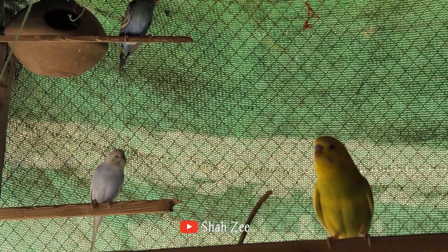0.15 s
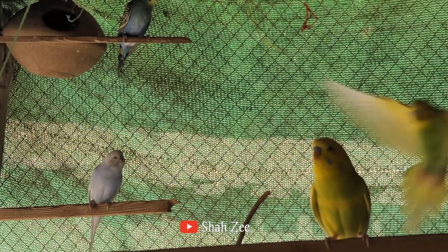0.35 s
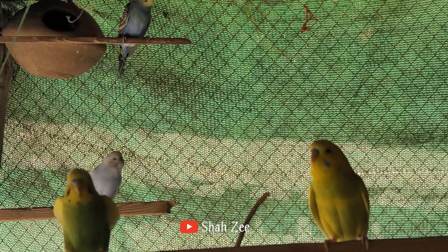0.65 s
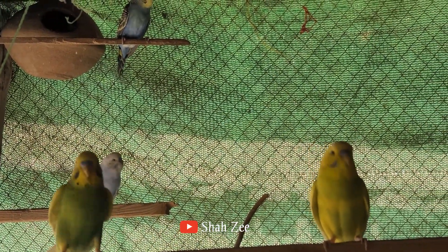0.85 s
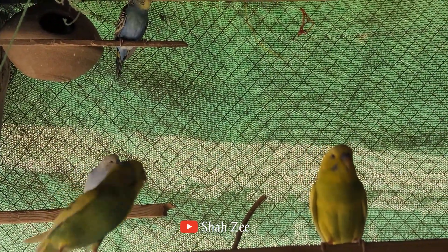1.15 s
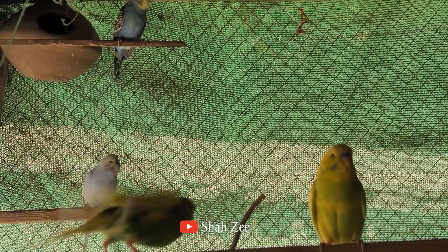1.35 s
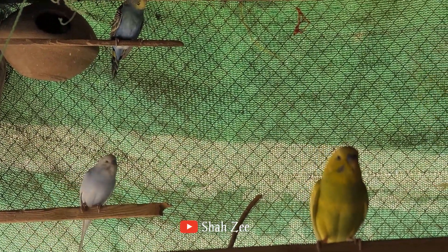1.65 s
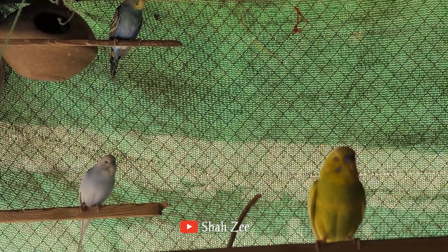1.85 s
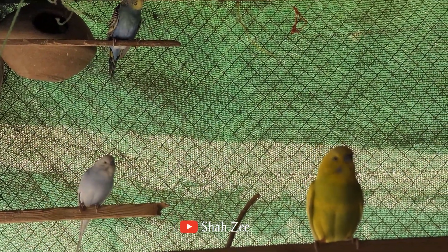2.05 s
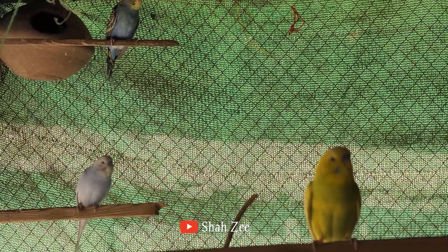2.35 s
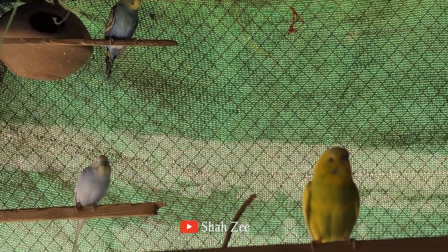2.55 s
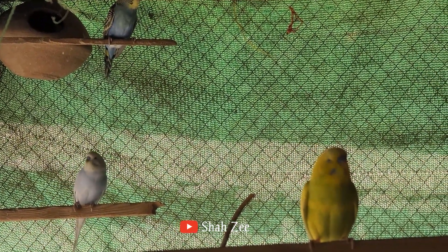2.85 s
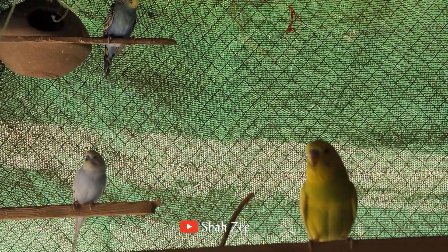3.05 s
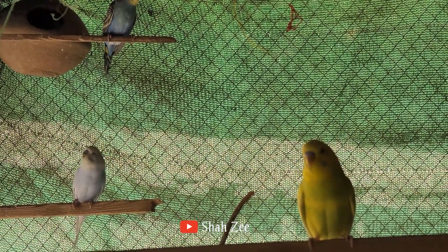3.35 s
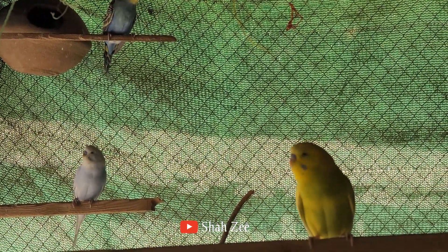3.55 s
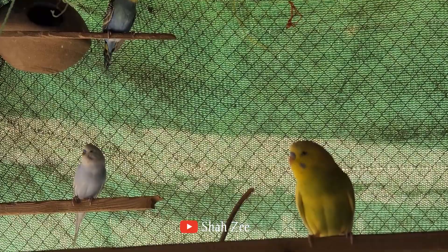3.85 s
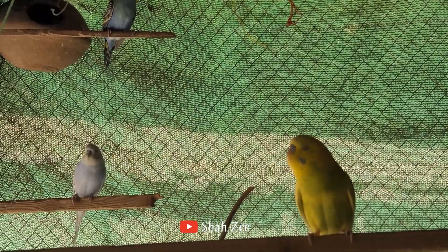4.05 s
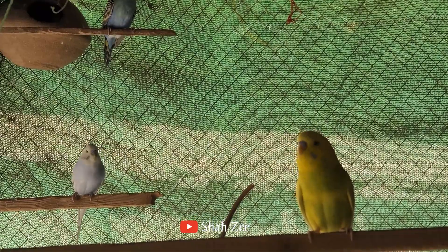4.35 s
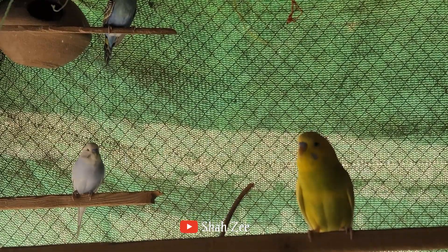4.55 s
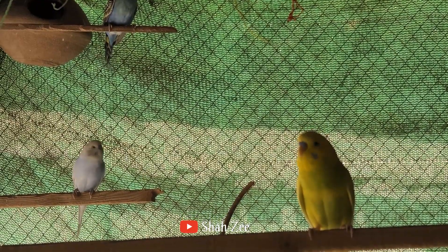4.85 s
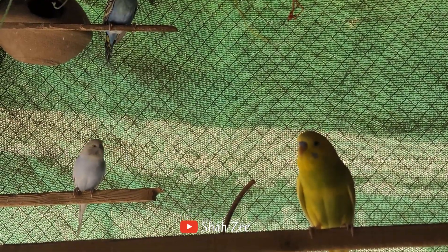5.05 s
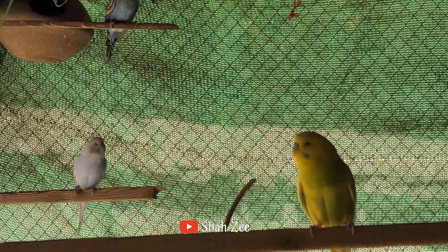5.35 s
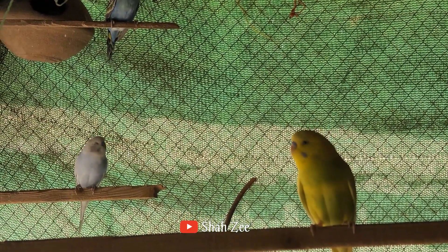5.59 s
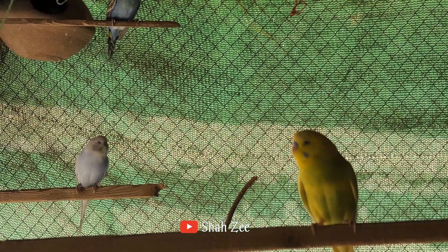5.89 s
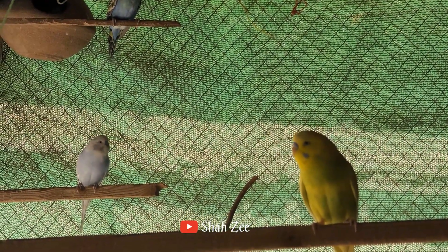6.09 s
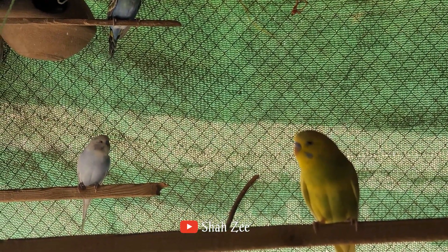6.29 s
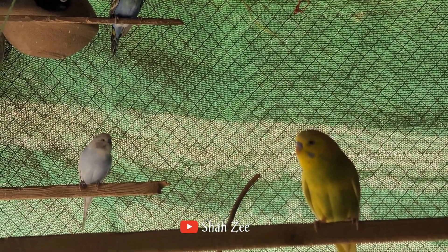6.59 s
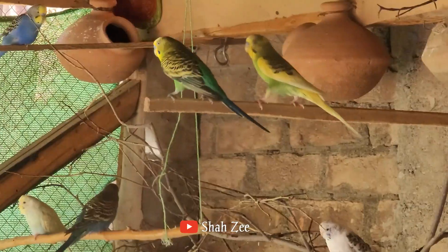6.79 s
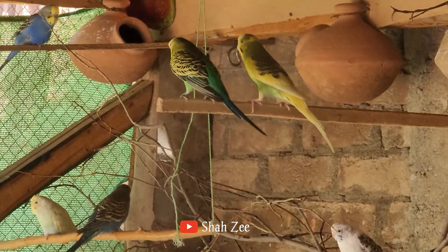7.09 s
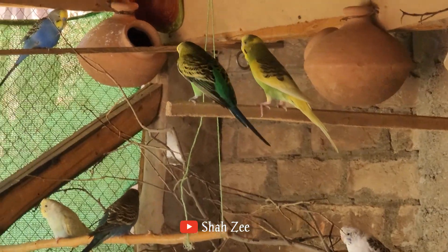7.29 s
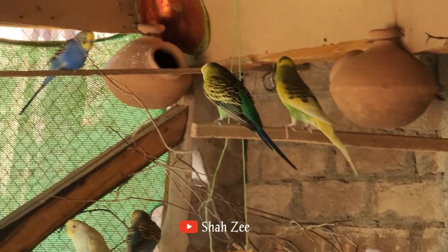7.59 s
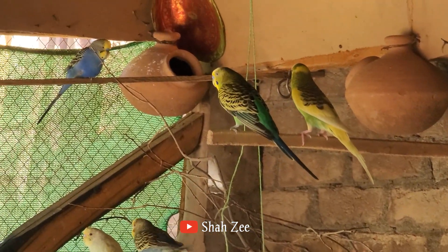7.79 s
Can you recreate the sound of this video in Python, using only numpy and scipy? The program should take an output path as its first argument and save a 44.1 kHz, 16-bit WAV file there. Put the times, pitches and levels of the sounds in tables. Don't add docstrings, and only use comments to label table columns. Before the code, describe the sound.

Close small parrots give short bursts of whistled, buzz-edged syllables, loudest around the middle, with short tight echoes off walls. Between bursts come airy wing flaps, low dry rasps and weak, high, regular chick peeps. Later, far birds whistle and chatter softly, and one more near chirp sounds with a swish. A handheld-style stereo pickup holds constant street rumble, faint hum and hiss, its automatic level easing back after loud calls.

```python
import sys
import numpy as np
from scipy import signal
from scipy.fft import rfft, irfft, next_fast_len
from scipy.io import wavfile
from scipy.ndimage import uniform_filter1d, map_coordinates

SR = 44100
rng = np.random.default_rng(int(sys.argv[2]) if len(sys.argv) > 2 else 0)


def master_out(mix):
    frames = np.transpose(np.atleast_2d(mix))
    ceiling = np.clip(frames, -1, 1)
    pcm = np.round(ceiling * 32767).astype(np.int16)
    wavfile.write(sys.argv[1], SR, pcm)


def how_loud(loudness_db):
    steps = np.asarray(loudness_db, float) / 20
    return 10 ** steps


N = 349713

# [t/s from just past its first crest, share of top pitch, level/dB]
PEEP_SHAPE = [
    (-.065, 0.59, -7.5),
    (-.02, 0.994, 3),
    (0, 0.93, 0.5),
    (0.043, .75, -1),
    (0.058, .82, -7),
    (.075, .9, 1.5),
    (0.11, 0.8, -19),
]


def evened(x):
    return x / np.sqrt(np.mean(x ** 2) + 1e-20)


def read(points, hz):
    f, value = np.transpose(points)
    return np.interp(np.log(hz + 1), np.log(f + 1), value)


def add(mix, s, sound):
    part = mix[max(round(s * SR), 0):][:len(sound)]
    part += sound[:len(part)]


def coloured(x, gain):
    size = next_fast_len(len(x))
    return irfft(rfft(x, size) * gain(np.fft.rfftfreq(size, 1 / SR)), size)[:len(x)]


def wobble(size, rate_hz):
    noise = rng.standard_normal(size + 2000)
    return evened(coloured(noise, lambda f: np.exp(-(f / rate_hz) ** 2)))[:size]


def beak_air(size):
    # [f/Hz, level/dB per Hz]
    air_spectrum = [(2650, -49), (4500, -13), (4770, 6.5), (5990, 3.5), (7450, -6.5), (10800, -18),
                    (13000, -6.5), (16000, -10.5)]
    lump_hz, lumps_db = np.linspace(0, SR / 2.6, 14), 7 * rng.standard_normal(14)
    noise = rng.standard_normal(size)
    return evened(coloured(noise, lambda f: how_loud(read(air_spectrum, f) + np.interp(f, lump_hz, lumps_db))))


def glide(length, start_hz, end_hz, db, buzz, breath_db=0):
    overtones_db = [-23, -38, -43, -39.5]
    low_voice_hz, throb_hz, throb_depth = 2050, 215.96, 0.6
    windpipe_hz, beak_top_hz = 1660, 4513
    size, buzz = round(max(length, .004) * SR), np.clip(buzz, 0, 1)

    shake = (.003 + .055 * buzz ** 1.7) * wobble(size, 300)
    hz = np.linspace(start_hz, end_hz, size) * (1 + shake)
    turns = 2 * np.pi * (np.cumsum(hz) / SR + rng.random())
    sag = np.linspace(1.12, .95, size)
    low_hz = low_voice_hz * (sag + 0.0547 * wobble(size, 79))

    beats = 2 * np.pi * np.cumsum(hz - low_hz) / SR
    flutter = (.1 + .7 * buzz ** 1.7) * wobble(size, 700)
    chop = 1 + buzz ** 1.4 * (0.5 * np.cos(beats) + 0.85 * np.cos(beats / 2)) + flutter

    throb_turns = np.cumsum(throb_hz * (1 + 0.296 * wobble(size, 59.1))) / SR + rng.random()
    pulse = 1 + throb_depth * min(buzz / .06, 1) * np.cos(2 * np.pi * throb_turns)

    overtones = sum(how_loud(d + breath_db) * np.cos(k * turns) for k, d in enumerate(overtones_db, 2))
    air = beak_air(size) * how_loud(-26 + breath_db + 10.23 * buzz)

    t = np.arange(size) / SR
    ramp = np.clip(np.minimum(t / 0.00469, (t[-1] - t) / 0.00446), 0, 1)
    swell = np.sin(np.pi / 2 * ramp) ** 2
    low_edge_hz = min(windpipe_hz, 0.906 * min(start_hz, end_hz))
    top_hz = max(beak_top_hz, 1.1 * max(start_hz, end_hz))
    voice = coloured(np.cos(turns) * chop * pulse,
                     lambda f: 1 / (1 + (low_edge_hz / (f + 1)) ** 14) / (1 + (f / top_hz) ** 16))
    return how_loud(db) * (evened(voice) + (overtones + air) * pulse) * swell


def syllable(shape, s, length, hz, db, buzz):
    overlap_s = .002
    starts = s + length * np.cumsum([0] + [row[0] for row in shape])
    return [(at, share * length + overlap_s, a * hz, b * hz, db + d, buzz * z)
            for at, (share, a, b, d, z) in zip(starts, shape)]


def chirps():
    # [share of length, start share of pitch, end share of pitch, level/dB, buzz 0-1]
    fall = [
        (.24, 1.06, 0.9105, -6.5, .03),
        (0.52, .96, .89, 1.5, 0.12),
        (.3, .89, .8, 2.5, 0.423),
    ]
    buzz = [
        (.5, 0.95, 1.08, 0.0013, 0.897),
        (.6, 1.06, 1.16, 0, 0.873),
    ]
    arch = [
        (.28, .82, .94, 2, 0.16),
        (.36, .95, 0.974, 3.5, 0.056),
        (.36, .97, .83, -.5, 0.347),
    ]
    # [t/s, length/s, pitch/Hz, level/dB, share of the buzz]
    falls = [
        (0.545, 0.0573, 3482, -26, 1),
        (0.969, 0.0369, 3960, -32, 1.4),
        (2.945, 0.053, 3504, -23, 0.6),
        (2.983, 0.0616, 3571, -16, 1.37),
        (3.278, 0.0629, 3451, -26, 1.02),
        (3.794, .06, 3450, -20.5, 0.61),
        (7.087, 0.0555, 3453, -29, 0.52),
        (7.872, 0.068, 3494, -37, .8),
    ]
    buzzes = [
        (.004, 0.0287, 3289, -25, 1.007),
        (.1, 0.0224, 3442, -27, 0.99),
        (.604, 0.0282, 3319, -26.5, 0.96),
        (3.04, 0.02745, 3004, -17.5, 0.862),
        (3.346, 0.028, 3352, -26.5, 1.106),
        (3.856, 0.0284, 3396, -22, 0.86),
        (7.155, 0.0225, 3318, -32.5, 1.05),
    ]
    arches = [
        (.04, 0.049, 3261, -22, 2),
        (.636, 0.0507, 3341, -22, 0.98),
        (1.07, 0.043, 3245, -24, 1.03),
        (1.326, 0.0472, 3109, -30.5, 0.39),
        (3.075, 0.0455, 3389, -19.5, 0.72),
        (3.381, 0.048, 3219, -22, 0.55),
        (3.89, 0.0488, 3261, -18, 0.9),
        (7.178, 0.0536, 3404, -28.5, 1.16),
    ]
    return [note for shape, rows in ((fall, falls), (buzz, buzzes), (arch, arches))
            for row in rows for note in syllable(shape, *row)]


def loose_notes():
    # [t/s, length/s, start f/Hz, end f/Hz, level/dB]
    side_notes = [(0.0, 0.008, 3120, 3150, -19), (0.0, 0.0327, 2800, 2666, -30.5),
                  (0.098, 0.022, 2800, 2912, -30), (.12, .028, 3050, 2800, -30),
                  (.05, .014, 3200, 3200, -23), (.588, 0.0204, 3305, 2800, -23),
                  (0.609, 0.0315, 3700, 3757, -29.5), (0.966, 0.0103, 3805, 4273, -34.5),
                  (1.002, 0.0247, 4273, 3376, -32), (1.184, 0.0123, 1993, 2000, -36.5),
                  (3.786, 0.0082, 4460, 3800, -30.5), (1.029, 0.0113, 3924, 3294, -33.5),
                  (1.027, 0.0281, 2961, 2980, -30.5), (1.014, 0.0247, 2410, 1881, -37),
                  (1.053, 0.0237, 1954, 2426, -33.5), (1.276, 0.05, 2890, 2308, -38),
                  (3.025, 0.0208, 3168, 2741, -23), (3.049, 0.0243, 3220, 3329, -26.5),
                  (3.067, 0.0284, 3013, 2642, -22), (4.036, 0.0152, 2933, 2203, -41.5),
                  (4.101, 0.059, 2900, 2410, -34.5), (7.14, 0.0192, 2955, 2546, -26.5),
                  (7.141, 0.0157, 4330, 4080, -37.5), (3.41, 0.0277, 2901, 2800, -33.5)]
    # [t/s, length/s, start f/Hz, end f/Hz, level/dB]
    flourish_notes = [(1.168, 0.013, 3628, 4317, -32.5), (1.182, 0.018, 4050, 3760, -30),
                      (1.199, 0.03573, 4156, 4249, -24), (1.213, 0.0165, 2800, 4184, -25),
                      (1.222, .026, 2945, 3423, -30), (1.235, .022, 4315, 3984, -27),
                      (1.248, .03, 2982, 3531, -21.5), (1.277, 0.0217, 3483, 3496, -31.5),
                      (1.19, 0.014, 4953, 4880, -42), (4.026, 0.015, 3395, 4460, -25.5),
                      (4.04, 0.012, 4326, 3640, -21), (4.052, 0.028, 3690, 3746, -27.5),
                      (4.06, 0.02, 4176, 4230, -18.5), (4.079, 0.0258, 2670, 3265, -24.5),
                      (4.082, 0.016, 3151, 4760, -14), (4.099, 0.0093, 4332, 3590, -28.5),
                      (4.105, .018, 3970, 3810, -17.5), (4.113, 0.027, 3372, 3232, -15),
                      (4.137, .012, 3365, 4265, -34.5), (4.147, 0.018, 3413, 3360, -26.5)]
    # [t/s, length/s, start f/Hz, end f/Hz, level/dB]
    low_notes = [
        (0.597, .016, 2167, 1963, -39.5),
        (0.622, 0.024, 2050, 1850, -43),
        (3.029, 0.013, 2198, 2003, -34.5),
        (3.066, .022, 2050, 1933, -34.5),
        (3.339, 0.014, 2300, 2050, -43),
        (3.356, .02, 2002, 1933, -37.5),
        (3.856, 0.012, 2050, 2003, -31),
        (3.881, 0.0157, 2050, 1923, -35),
        (7.144, 0.0098, 2160, 2050, -33.5),
        (7.177, .022, 2110, 1960, -43),
    ]
    # [t/s, length/s, start f/Hz, end f/Hz, level/dB]
    clear_notes = [(.034, 0.0111, 2000, 2004, -32.5), (.065, .033, 2820, 2729, -24.5),
                   (.148, 0.014, 2950, 2860, -23), (.69, 0.0217, 2909, 2800, -34.5),
                   (0.989, 0.0188, 2797, 2868, -25), (1.012, 0.0116, 2790, 2800, -30.5),
                   (1.038, 0.0127, 1488, 1542, -37), (1.058, 0.0118, 4330, 4310, -40.5),
                   (1.095, .03, 2800, 2681, -36), (1.128, .035, 2703, 2697, -39),
                   (1.299, 0.0161, 1845, 1860, -33), (1.355, 0.0211, 2753, 2643, -35.5),
                   (1.385, 0.0295, 2724, 2703, -41), (3.099, 0.0218, 2863, 2701, -19.5),
                   (3.118, 0.0179, 3235, 3245, -31), (3.125, 0.0228, 2755, 2693, -32.5),
                   (3.152, 0.0307, 2772, 2747, -35.5), (3.152, 0.0277, 3270, 3264, -37.5),
                   (3.921, 0.014, 2896, 2817, -21), (3.95, 0.0128, 3042, 2916, -33),
                   (3.966, 0.0128, 3066, 3108, -30.5), (3.99, 0.0254, 3098, 3079, -39),
                   (4.043, 0.0202, 1947, 1850, -39), (2.685, .03, 2030, 1990, -46),
                   (2.718, .025, 2050, 2020, -52), (2.76, .025, 2050, 2000, -55),
                   (2.93, .016, 3500, 3500, -48), (7.213, 0.0255, 2754, 2659, -26),
                   (7.234, 0.0237, 2716, 2729, -40), (7.225, .02, 3400, 3265, -36),
                   (7.26, .018, 3273, 3360, -41)]
    groups = ((side_notes, .491), (flourish_notes, .3), (low_notes, .2), (clear_notes, .13))
    return [(*row, buzz) for rows, buzz in groups for row in rows]


def rasp(length, db, throat_hz, throat_db, tilt_db):
    # [f/Hz, level/dB per Hz]
    rasp_spectrum = [(700, -34.5), (1000, -9), (1400, 5), (1900, 1), (3400, 4.5), (4500, 0), (6600, 0.5),
                     (8500, -12.5), (11000, -16), (13500, -16), (16000, -24.5)]
    size = round(max(length, .003) * SR)
    clicks = rng.standard_normal(size) * (1 + .5 * wobble(size, 430))
    broad = evened(coloured(clicks, lambda f: how_loud(read(rasp_spectrum, f) + tilt_db * np.log2((f + 1) / 4000))))
    ring = evened(coloured(clicks, lambda f: 1 / (1 + ((f - throat_hz) / (.06 * throat_hz)) ** 2)))
    u = np.linspace(0, 1, size)
    swell = np.minimum(u / 0.017, 1) * np.cos(np.pi / 2 * u ** 1.9)
    return how_loud(db) * (broad + how_loud(throat_db) * ring) * swell


def rasps_and_ticks():
    # [t/s, length/s, level/dB, throat f/Hz, throat level/dB]
    swishes = [
        (0.098, 0.0863, -31.5, 6526, -1),
        (0.483, 0.0184, -50, 4540, -20),
        (0.577, 0.045, -45, 5900, 4),
        (2.684, 0.066, -43, 2039, -6),
        (2.675, .008, -50, 2000, 0),
        (6.715, .055, -70, 14000, 0),
        (2.755, 0.059, -46.5, 2084, -11),
        (2.816, 0.03, -50, 2027, -4),
        (7.34, 0.0395, -40.5, 3360, -19.5),
        (7.362, 0.188, -47, 3550, -17),
    ]
    # [t/s, level/dB, ring f/Hz, ring level/dB]
    ticks = [
        (6.043, -58, 13000, -13),
        (7.61, -52, 11060, -20),
    ]
    out = np.zeros(N)
    for s, length, db, hz, throat_db in swishes:
        tilt_db = 7 * np.log2(hz / 2800)
        add(out, s, rasp(length, db, hz, throat_db, tilt_db))
    for s, *tick in ticks:
        add(out, s, rasp(0.0138, *tick, tilt_db=2))
    return out


def walls(x, stretch, gap_s):
    # [f/Hz, t60/s]
    decay = [(1000, 0.093), (2000, 0.157), (3000, 0.1406), (4200, 0.1917), (6000, 0.1756), (15000, 0.1164)]
    taps = np.zeros((2, SR // 2))
    at = np.arange(round(gap_s * SR), SR // 2 - 20, 20)
    at = at + rng.integers(0, 20, (2, len(at)))
    np.put_along_axis(taps, at, rng.choice([-1., 1.], at.shape), 1)
    hz, t, z = signal.stft(taps, SR, nperseg=128)
    fade = how_loud(-60 * t / (stretch * read(decay, hz))[:, None])
    tail = signal.istft(z * fade, SR, nperseg=128)[1]
    echoes = signal.fftconvolve(x[None], tail / np.linalg.norm(tail[0]), axes=1)[:, :N]
    wander = np.arange(N) + 5e-5 * SR * wobble(N, 45)
    return np.array([map_coordinates(ear, [wander], order=2) for ear in echoes])


def flock():
    # [from t/s, breath/dB]
    turns = [
        (-.1, 3.5),
        (.4, 0.5),
        (.85, -0.5),
        (1.15, 0),
        (2.5, -4),
        (3.24, -0.5),
        (3.6, -3.5),
        (3.99, 1),
        (6.5, -0.5),
        (7.6, 10),
    ]
    perches = np.zeros((3, N))
    for s, *note in loose_notes() + chirps():
        turn = np.searchsorted(np.transpose(turns)[0], s) - 1
        add(perches[turn % len(perches)], s, glide(*note, turns[turn][1]))
    perches[1] += rasps_and_ticks()
    out = how_loud(-18.0) * walls(perches.sum(0), 1.7, 0.011)
    for voice, lag in zip(perches, (16, -14, -12)):
        out += how_loud(-3.2) * np.array([voice, np.roll(voice, lag)])
        out += how_loud(-1.8) * walls(voice, 0.916, 0.001007)
    return out


def wash():
    # [f/Hz, level/dB per Hz]
    rumble_spectrum = [(12, -31), (20, -11.5), (49, -38), (86, 1.5), (145, -8.5), (183, -3.5), (231, -12),
                       (409, -10.5), (592, -13), (1100, -22.5), (1430, -58), (2420, -120)]
    hiss_spectrum = [(530, -34), (900, -96.5), (1120, -6), (1410, -2.5), (1750, -4), (2760, -5.5),
                     (3590, -7.5), (4500, -11.5), (5200, -8.5), (6600, -8), (7400, -16.5), (9000, -21.5),
                     (12900, -25), (15800, -34.5)]
    # [f/Hz, likeness -1 to 1]
    likeness = [(60, 0.937), (180, 0.984), (550, 0.483), (1650, -0.286), (4970, 0.126), (15000, -0.19)]
    # [t/s, level/dB]
    traffic = [(0, 4), (.3, 2), (.45, 7.5), (.6, 1.5), (1.3, 1), (1.5, 3.5), (2.098, 1.5), (2.7, 4), (3, 2),
               (4.5, 1.5), (5.5, 1.5), (6.2, 2.5), (7, 1), (7.93, 2.5)]
    frames, hz = N // 256 + 5, np.fft.rfftfreq(1024, 1 / SR)
    t = np.arange(frames) * 256 / SR
    a, b, c, d, patches = rng.standard_normal((frames, 513, 5)).T
    patches = evened(uniform_filter1d(uniform_filter1d(patches, 10, 0), 16, 1))
    same, left = np.clip(read(likeness, hz), -1, 1)[:, None], a + 1j * b
    z = np.array([left, same * left + np.sqrt(1 - same ** 2) * (c + 1j * d)])
    swell_db = np.interp(t, *np.transpose(traffic))
    dimmed_db = -3 * np.outer(1 / (1 + (8500 / (hz + 1)) ** 8), t > 6.77)
    rumble = how_loud(read(rumble_spectrum, hz)[:, None] + swell_db)
    hiss = how_loud(read(hiss_spectrum, hz)[:, None] - 20.5 + 7.5 + dimmed_db)
    z *= np.hypot(rumble, hiss) * how_loud(0.816 * patches)
    return how_loud(-47) * evened(signal.istft(z, nperseg=1024, noverlap=768)[1][:, :N])


def town():
    # [t/s, length/s, f/Hz, level/dB]
    street_tones = [
        (0.0, 0.122, 476.6, -47.5),
        (1.4, 0.53, 480, -56),
        (1.59, 0.61, 1251, -64),
        (1.953, 0.14, 334.2, -51.5),
        (4.34, 0.558, 341.4, -54.5),
    ]
    hum_turns = np.cumsum(99.5 * (1 + 0.02835 * wobble(N, 5.65))) / SR
    hum = np.cos(2 * np.pi * hum_turns) * (1 + 0.12 * wobble(N, 5.8))
    drones = np.zeros(N)
    for s, length, hz, db in street_tones:
        size = round(length * SR)
        turns = np.cumsum(hz * (1 + 0.0231 * wobble(size, 27))) / SR
        add(drones, s, how_loud(db) * np.cos(2 * np.pi * turns) * np.hanning(size))
    return wash() + how_loud(-57.5) * hum + drones


def wings():
    # [t/s, peak level/dB]
    flaps = [(0.388, -38), (0.413, -38), (0.434, -39), (0.465, -30), (0.486, -39), (1.447, -21),
             (1.496, -22), (2.608, -35), (2.623, -42), (2.651, -23), (2.67, -42)]
    out, t = np.zeros(N), np.arange(900) / SR
    for s, db in flaps:
        add(out, s, how_loud(db - 14.5) * np.sin(2 * np.pi * 90 * t) * np.hanning(len(t)))
    return out


def peep(db, top_hz):
    partials_db = [4.5, -9, -2.5]
    s, share, swell_db = np.transpose(PEEP_SHAPE)
    t = np.arange(s[0], s[-1], 1 / SR)
    hz = top_hz * np.interp(t, s, share) * (1 + .022 * wobble(len(t), 250))
    turns = np.cumsum(hz) / SR
    tone = sum(how_loud(d) * np.cos(2 * np.pi * k * turns) for k, d in enumerate(partials_db, 1))
    level_db = db + np.interp(t, s, swell_db) + 2.9 * wobble(len(t), 90)
    return how_loud(level_db) * tone * signal.windows.tukey(len(t), .2)


def chick():
    # [t/s just past the first crest, level/dB, top f/Hz]
    peeps = [(1.64, -60, 6128), (2.158, -59.5, 6190), (2.678, -58, 6304), (3.192, -59.5, 6070),
             (3.701, -57.5, 6170), (4.230, -59, 6023), (4.759, -59.5, 6050), (5.255, -60, 6072),
             (5.755, -60, 5935), (6.275, -61, 5966), (6.758, -91, 5690), (7.700, -57.5, 6268)]
    voice = np.zeros(N)
    for s, *row in peeps:
        add(voice, s + PEEP_SHAPE[0][0], peep(*row))
    return how_loud(-7) * voice + how_loud(-1.5) * walls(voice, 1.4, 0.000973)


def far_birds():
    # [t/s, length/s, start f/Hz, end f/Hz, level/dB]
    whistles = [(4.498, 0.0706, 3317, 3290, -60.5), (4.57, .03, 2200, 2150, -66),
                (4.635, 0.0385, 2260, 2080, -65.5), (4.668, .06, 3044, 2950, -62),
                (4.753, 0.096, 2728, 2700, -68), (5.21, 0.06, 2865, 2870, -54),
                (5.2, 0.03, 3550, 3540, -57), (5.25, 0.198, 3551, 3540, -69.5),
                (5.9, 0.144, 3565, 3540, -69), (5.918, 0.028, 2392, 2250, -63),
                (5.958, 0.048, 2086, 2010, -58.5), (5.298, 0.089, 2925, 2900, -64),
                (5.407, 0.1135, 2922, 2890, -63), (5.569, 0.071, 2856, 2660, -65),
                (7.447, 0.0517, 2633, 2620, -46), (7.399, 0.035, 2680, 2630, -63),
                (7.69, 0.037, 2475, 2500, -61.5)]
    chatter = [(5.127, 0.025, 3230, 3217, -54), (5.214, 0.04, 3720, 2800, -47),
               (5.151, 0.027, 2050, 1742, -48.5), (5.163, .04, 2288, 1900, -50.5),
               (5.366, 0.035, 2750, 2800, -57.5), (7.49, 0.018, 3550, 3470, -52.5),
               (7.558, 0.031, 2690, 2600, -53.5), (7.729, 0.032, 2750, 2907, -49.5),
               (7.76, .03, 3441, 3340, -49), (7.774, 0.03, 2899, 3017, -52.5),
               (7.805, .018, 2952, 2878, -45.5), (7.825, 0.0405, 3213, 2878, -49.5)]
    voice = np.zeros(N)
    for s, *note in whistles:
        add(voice, s, glide(*note, buzz=.12, breath_db=-15))
    for s, *note in chatter:
        add(voice, s, glide(*note, buzz=.7, breath_db=4.5))
    return how_loud(-1) * voice + walls(voice, 1.19, .004)


def scene():
    return flock() + town() + wings() + chick() + far_birds()


def band_limit(x):
    return signal.sosfilt(signal.butter(12, 15840, fs=SR, output="sos"), x)


def record(dry):
    # [f/Hz, left-right/dB]
    lean = [(60, -0.5), (240, -1.5), (950, -1.64), (3000, -0.5), (5500, -4), (9500, -2.5), (15000, -6.5)]
    ports = np.array([coloured(v, lambda f: how_loud(side * read(lean, f)) * (f < 15850))
                      for v, side in zip(dry, (.5, -.5))])
    power_db = 10 * np.log10(abs(uniform_filter1d((ports ** 2).mean(0), 2000)) + 1e-12)
    recovery_db = np.arange(N) * 6.24 / SR
    held_db = np.maximum.accumulate(power_db + recovery_db) - recovery_db
    over_db = np.maximum(held_db + 25.0, 0)
    ducked = how_loud(3.5) * ports / how_loud(0.338 * uniform_filter1d(over_db, 800))
    return band_limit(ducked)


dry = scene()
out = record(dry)
master_out(out)
```